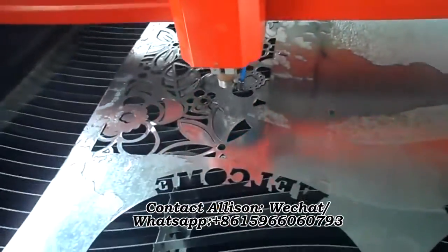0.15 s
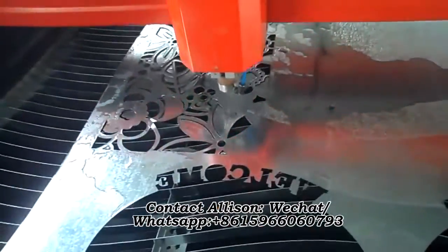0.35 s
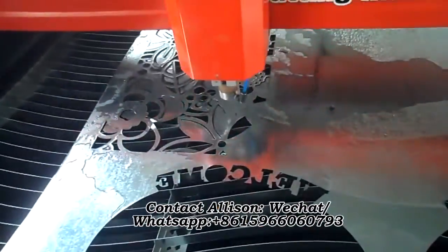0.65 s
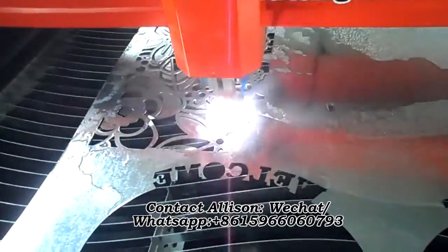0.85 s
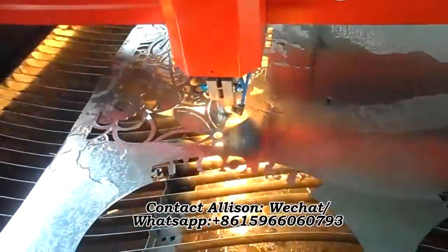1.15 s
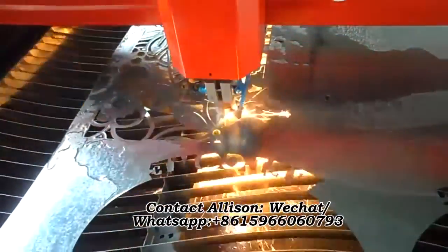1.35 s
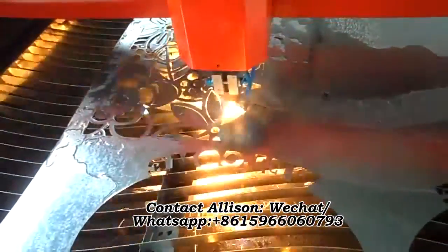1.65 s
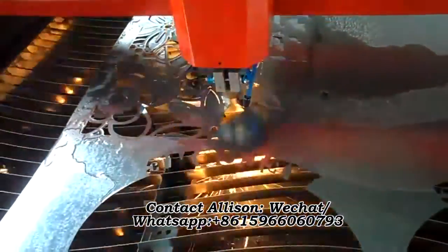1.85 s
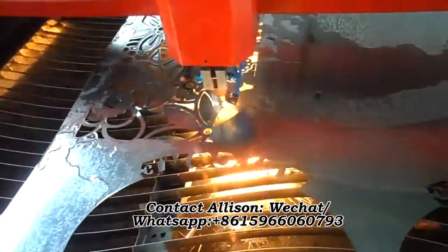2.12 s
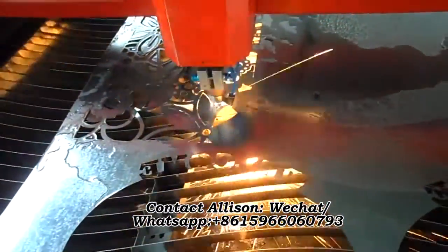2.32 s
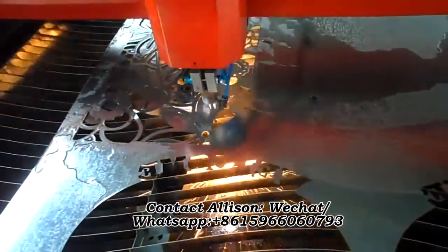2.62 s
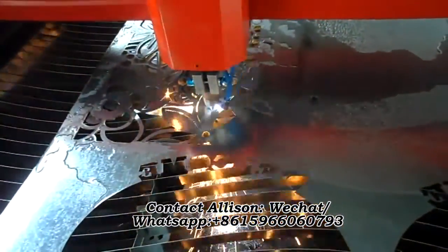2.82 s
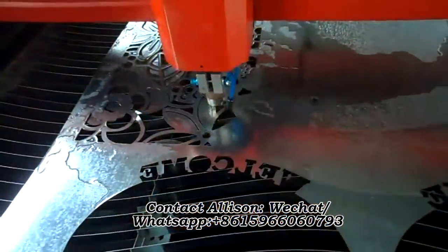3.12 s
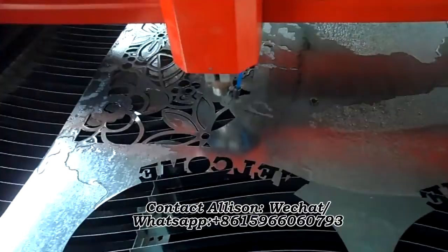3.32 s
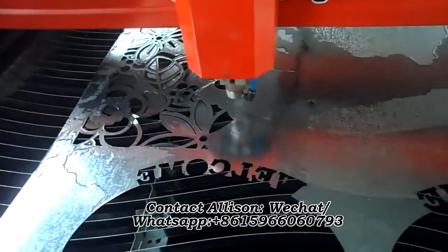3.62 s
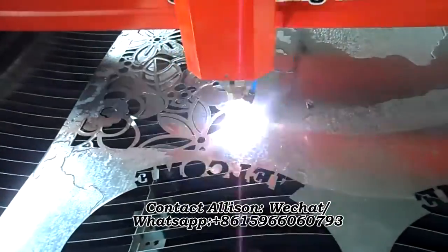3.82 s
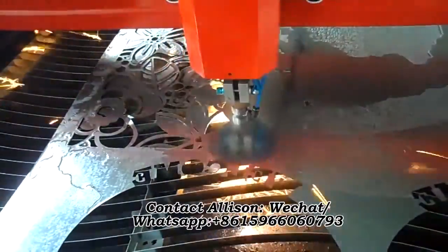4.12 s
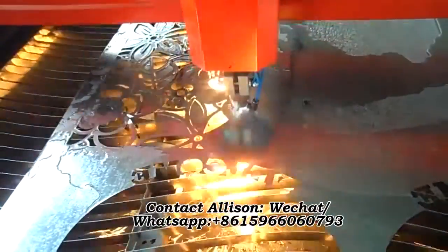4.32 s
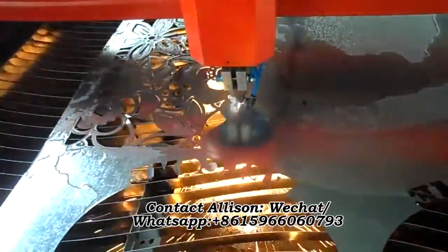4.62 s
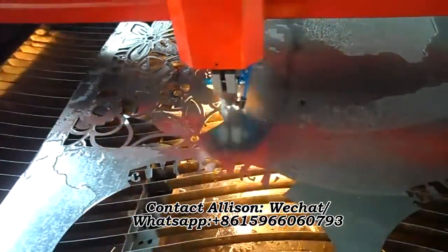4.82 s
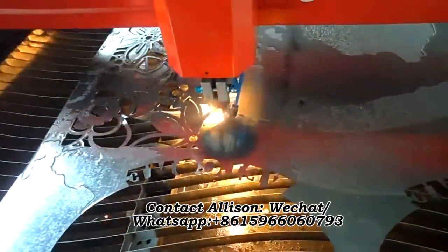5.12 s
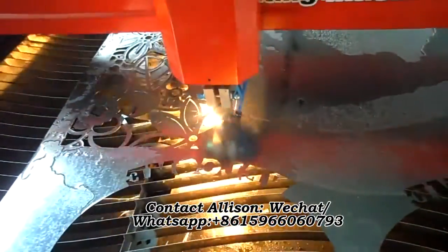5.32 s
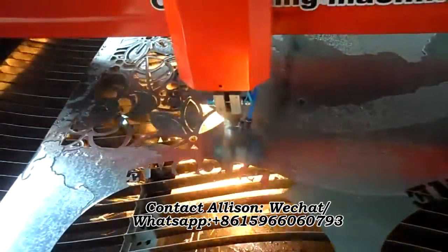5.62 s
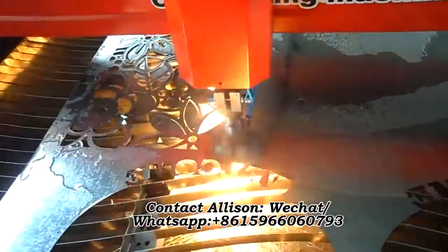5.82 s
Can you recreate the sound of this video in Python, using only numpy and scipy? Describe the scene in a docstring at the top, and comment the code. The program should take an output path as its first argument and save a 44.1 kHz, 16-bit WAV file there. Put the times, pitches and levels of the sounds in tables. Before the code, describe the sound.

A plasma cutter blows a hollow jet of gas, then snaps alight and sizzles through a steel sheet. The bright hiss wanders and surges, with tiny spatter ticks and short whistles. Midway the arc dies with a pop, leaving about a second of rising gas before it strikes and cuts again. A stationary microphone also picks up the workshop's steady rush and a fume extractor's faint rumble.

```python
"""Plasma torch cutting steel

In a workshop, a machine-guided torch cuts thin steel sheet on a slatted table. Raised above the sheet,
its open gas jet rings hollowly. The arc strikes with a snap and pierces the steel, and the sound turns
to a bright, wandering hiss with brief whistles in the cut. The arc pops out, the jet builds again and
a second cut starts. Shop noise and a fume extractor carry on underneath."""
import sys
import numpy as np
from scipy import signal
from scipy.fft import rfft, irfft, next_fast_len
from scipy.io import wavfile

SR = 44100
rng = np.random.default_rng(int(sys.argv[2]) if len(sys.argv) > 2 else 0)


def store_pcm(level_fs):
    """Save levels as 16-bit WAV."""
    pcm = np.round(np.clip(level_fs, -1, 1) * 32767).astype(np.int16)
    wavfile.write(sys.argv[1], SR, np.atleast_2d(pcm).T)


N = 262395
TIME = np.arange(N) / SR
BIN_HZ = np.maximum(np.arange(N // 2 + 1) * SR / N, 1)
CUTOFF_HZ = 15720

# The tone of each noise. Each row: frequency in Hz, relative strength in dB.
SHOP_SPECTRUM = [(15, -36), (25, -11), (91, -9.5), (183, -9.5), (274, -8), (331, -10), (666, -9.5),
                 (762, -12.5), (1140, -10), (1570, -11.5), (3170, -7.5), (4870, -12.5), (7300, -6.5),
                 (9810, -12.5), (15500, -13.5)]
JET_ROAR_SPECTRUM = [(15, -38), (25, -2), (76, 0), (225, -2.5), (369, -11), (406, -7.5), (595, -5),
                     (778, -7.5), (1140, -3), (1730, -8), (2400, 4), (3120, -30), (5280, -120)]
JET_HISS_SPECTRUM = [(1500, -2), (2000, -11), (2400, 5), (2750, 3), (3250, -1), (3900, -9), (5400, -12.5),
                     (6100, -3.5), (6900, -4.5), (7500, 0.5), (8400, -5.5), (9100, -5), (10500, -16.5),
                     (15000, -7.5)]
RUMBLE_SPECTRUM = [(20, -16), (34, 3.5), (55, -5), (90, 2.5), (150, -6), (205, 0.5), (250, -5.5),
                   (310, -8.5)]
SPLASH_SPECTRUM = [(1500, -13), (2100, -6), (2500, 7.5), (2950, -13), (3700, -27), (5600, -13), (6450, 3),
                   (7000, -2), (7450, -2), (8500, -13), (11800, -17), (15000, -26)]
CUT_SPECTRUM = [(15, -37), (25, 3.5), (152, -3.5), (204, -15), (378, -25), (598, -15.5), (945, -6),
                (1050, -4), (1800, -6.5), (3260, -2.5), (3830, -2.5), (6050, -1), (8810, -2.5), (12200, 0),
                (15500, -5)]
# Resonances (+) and hollows (-) of the cutting table. Each row: pitch in Hz, width in Hz, gain in dB.
TABLE_RESONANCES = [(86, 25, -0.5), (218, 29, 3), (364, 67, -3), (417, 24, 3.5), (505, 5.9, 5.5),
                    (596, 67, 4.5), (692, 47, 4), (915, 36, -3), (1290, 57, 2), (1406, 88, -3),
                    (1550, 130, 2.5), (1800, 110, -4.5), (2055, 160, 3.5), (2320, 80, -1), (2537, 99, -7),
                    (3180, 250, 1.5), (3850, 400, -3)]
# Narrow tones of the open jet. Each row: pitch in Hz, width in Hz, lift in dB.
JET_RESONANCES = [(2567, 35, 8.5), (2820, 160, 1.5), (5030, 170, 8.5), (7340, 150, 2)]
# Gas blows freely and builds until the arc strikes.
# Each row: start and end in seconds, relative level it climbs to in dB, base climb in dB per second.
JET_BLOWS = [(-.1, 0.919, 0, 1.06), (3.328, 4.001, -3.5, 15)]
# The open jet's roar, hollow ring and upper hiss.
# Each row: level in dB, share of the base climb, lift close to the sheet in dB.
JET_LAYERS = [(-25.5, 0.56, 2), (-20.5, 0.64, 0), (-19.5, 0.9, 0.4)]
# When the arc burns. Each row: start and end in seconds.
ARC_SPANS = [(.911, 3.033), (3.993, 6.0)]
# The arc bores through the sheet.
# Each row: strike and breakthrough in seconds, splash level in dB, lift of the sizzle in dB.
PIERCES = [(0.917, 1.121, -24, 4), (3.99, 4.218, -26.5, 3)]
# The arc strikes or dies. Each row: time in seconds, low boom in dB, crack in dB, seconds for the
# crack to fade by 60 dB.
ARC_SNAPS = [(0.9117, -13.5, -12, 0.062), (3.028, -10.5, -12, 0.04), (3.0818, -33, -15.5, 0.021),
             (3.104, -25, -16, 0.023), (3.9938, -14, -10, 0.019)]
# The jet sings on an edge. Each row: start and end in seconds, pitch in Hz, width in Hz, level in dB.
EDGE_WHISTLES = [(.5, .97, 6300, 270, -35), (1.43, 1.884, 3350, 160, -29), (1.435, 1.885, 6130, 300, -30.5),
                 (1.663, 1.868, 1586, 150, -34.5), (1.69, 1.883, 1070, 220, -35.5),
                 (1.98, 2.35, 2764, 140, -31), (2.15, 2.6, 7840, 500, -35), (2.48, 2.62, 6260, 250, -34),
                 (2.74, 2.857, 3170, 250, -32), (2.92, 3.03, 5960, 300, -29.5),
                 (3.37, 3.553, 4300, 360, -34.5), (4.225, 4.43, 12100, 800, -31),
                 (4.493, 5.297, 2290, 140, -36), (4.51, 6.1, 1065, 77, -38.5), (4.72, 5.05, 5250, 220, -29),
                 (4.82, 5.3, 1960, 250, -36), (4.9, 5.36, 3200, 250, -37), (5.34, 5.44, 12600, 500, -25),
                 (5.375, 5.51, 6040, 220, -24.5)]
# Rise and fall of the flame below, one list per cut. Each row: time in seconds, relative level in dB.
FLAME_CURVES = [
    [(1.0, -41.5), (1.124, -40), (1.76, -38.5), (2.172, -36.5), (2.492, -40.5), (2.95, -40.5)],
    [(4.1, -43), (4.24, -48), (4.5, -41.5), (5.228, -37), (5.528, -35.5), (5.9, -37.5)],
]
# Rise and fall of the arc's roar, one list per cut. Each row: time in seconds, base level in dB.
ROAR_CURVES = [
    [(1.0, -33.5), (1.092, -35), (1.118, -36.5), (1.83, -32), (1.912, -35), (2.254, -28.5), (2.83, -36),
     (2.884, -43), (2.95, -30.5)],
    [(4.1, -35), (4.49, -36.5), (4.596, -32), (4.75, -36.5), (4.886, -32.5), (5.308, -30.5), (5.328, -34.5),
     (5.614, -28.5), (5.9, -35.5)],
]
# The jet bites into more metal. Each row: peak time and length in seconds, hiss and sizzle lifts in dB.
METAL_BITES = [(1.094, 0.045, 3, 0.5), (1.46, 0.1, 2, 4), (1.62, .11, 4, 4), (1.836, .05, 3.5, 0.5),
               (2.083, 0.09, 4, 2), (2.26, 0.17, 1, 0.5), (2.452, 0.076, 6, 5.5), (2.798, .08, 4, 5.5),
               (3.0, .08, 4.5, 3.5), (4.78, 0.11, 3, 5.5), (5.405, .06, 3.5, 3), (5.75, 0.17, 5, 4.5),
               (5.927, 0.054, 4, 4)]
# The treble sinks after each breakthrough. Each row: time and length in seconds, sizzle loss in dB.
TREBLE_LULLS = [(1.335, 0.15, 4), (4.52, 0.21, 7.5)]
# The rasp chokes for an instant. Each row: time and length in seconds, rasp loss in dB.
RASP_CHOKES = [(1.185, .06, 2), (1.412, 0.029, 11), (1.885, 0.033, 3), (2.89, 0.049, 2), (4.24, 0.036, 7),
               (4.36, .06, 6), (4.467, .045, 13), (5.36, 0.022, 9), (5.695, .04, 7.5)]


def from_db(db):
    """Turn decibels into a gain."""
    return 10 ** (np.asarray(db) / 20)


def unit_power(x):
    """Scale a signal to an average power of 1."""
    return x / np.sqrt(np.mean(x ** 2) + 1e-20)


def level_curve(cuts):
    """Join the points of all cuts into one level for every sample."""
    seconds, db = np.vstack(cuts).T
    return np.interp(TIME, seconds, db)


def during(spans, edge_s):
    """One inside the spans and zero outside, with short ramps at their ends."""
    return sum(np.clip(np.minimum(TIME - start, end - TIME) / edge_s + .5, 0, 1) for start, end in spans)


def swells(rows, lead_s=0):
    """Bell-shaped swings in dB; each length is the width at half height."""
    return sum(db * .5 ** ((2 * (TIME + lead_s - s) / length) ** 2) for s, length, db in rows)


def drift(per_s):
    """A random wander of typical size 1 that picks `per_s` new values a second."""
    points = rng.standard_normal(16384)
    return unit_power(np.interp(TIME * per_s, np.arange(len(points)), points))


def colour(spectrum):
    """A gain for every frequency, joining the points of a spectrum."""
    hz, db = np.transpose(spectrum)
    return from_db(np.interp(np.log(BIN_HZ), np.log(hz), db))


def peak(hz, width, height=1):
    """A bell-shaped bump around one frequency."""
    return height / (1 + (2 * (BIN_HZ - hz) / width) ** 2)


def resonances(rows):
    """A gain for every frequency, from a set of bumps and hollows."""
    return from_db(sum(peak(hz, width, db) for hz, width, db in rows))


def band(low_hz, high_hz):
    """A gain that falls steeply outside two frequencies."""
    return 1 / np.sqrt((1 + (low_hz / BIN_HZ) ** 16) * (1 + (BIN_HZ / high_hz) ** 16))


def noise(gain):
    """Noise of power 1, shaped by a gain for every frequency."""
    size = next_fast_len(N, True)
    gain = np.interp(np.arange(size // 2 + 1) * SR / size, BIN_HZ, gain * (BIN_HZ < CUTOFF_HZ))
    white = rfft(rng.standard_normal(size))
    return unit_power(irfft(white * gain, size)[:N])


def moving_echoes(x, depth, changes_per_s, count=28, shortest_s=.0008, longest_s=.016):
    """Echoes off the sheet and machine come and go as the torch travels, so the treble wanders."""
    treble = signal.sosfilt(signal.butter(1, 1200, "high", fs=SR, output="sos"), x)
    delays = np.geomspace(shortest_s, longest_s, count) * rng.uniform(0.94, 1.05, count)
    echoes = sum(drift(changes_per_s) * np.roll(treble, int(delay * SR)) for delay in delays)
    return (x + depth * echoes / np.sqrt(count)) / np.hypot(1, depth)


def workshop_echo(x, echo_db=-12, fade_s=0.29):
    """The machine frame and the walls add a weak, blurred tail."""
    age = TIME[:SR // 2]
    tail = rng.standard_normal(len(age)) * from_db(-60 * age / fade_s) * (age > .008)
    return x + from_db(echo_db) * signal.oaconvolve(x, tail / np.linalg.norm(tail))[:N]


def extractor(level_db=-43):
    """The fume extractor rumbles steadily under the table."""
    return from_db(level_db) * noise(band(27, 190))


def shop_noise(table_tone, level_db=-29):
    """The steady rush of the shop and of gas that keeps leaking from the nozzle."""
    rush = noise(colour(SHOP_SPECTRUM) * table_tone)
    return from_db(level_db) * moving_echoes(rush, depth=0.44, changes_per_s=1.52)


def jet_flow(climb_share, close_db, attack_s=0.054, descent_s=0.17):
    """Gain of one jet layer: it opens fast, climbs, lifts as the torch drops, then stops suddenly."""
    gain = 0
    for start, end, db, climb in JET_BLOWS:
        opening = during([(start, end)], 0.0063) * np.clip((TIME - start) / attack_s, 0, 1)
        left_to_climb_db = climb_share * climb * np.maximum(end - TIME, 0)
        close = during([(end - descent_s, end + descent_s)], 0.065)
        gain += opening * from_db(db - left_to_climb_db + close_db * close)
    return gain


def open_jet(table_tone, flutter_db=1.0):
    """Gas from the raised nozzle makes a low roar, a fluttering hollow ring and an upper hiss."""
    tones = colour(JET_HISS_SPECTRUM) * resonances(JET_RESONANCES) * table_tone
    roar = noise(colour(JET_ROAR_SPECTRUM) * table_tone * band(22, 1950))
    ring = noise(tones * band(1860, 3900))
    ring *= unit_power(from_db(flutter_db * drift(per_s=260)))
    hiss = noise(tones * band(4050, 19000))
    rush = sum(from_db(db) * jet_flow(share, close_db) * layer
               for (db, share, close_db), layer in zip(JET_LAYERS, [roar, ring, hiss]))
    return moving_echoes(rush, depth=0.41, changes_per_s=2.45)


def gas_puff(table_tone, level_db=-25, fade_s=0.11):
    """When the first arc dies, hot gas left in the torch puffs out and fades."""
    age = TIME - ARC_SPANS[0][1]
    fade = (age > 0) * from_db(level_db - 60 * np.maximum(age, 0) / fade_s)
    return fade * noise(colour(SHOP_SPECTRUM) * table_tone * band(60, 14000))


def flame_rumble(table_tone, level_db=-41, swing_scale=1.7):
    """The flame that leaves the cut rumbles below the sheet."""
    strength = during(ARC_SPANS, 0.0047) * from_db(swing_scale * level_curve(FLAME_CURVES))
    rumble = noise(colour(RUMBLE_SPECTRUM) * table_tone * band(22, 326))
    return from_db(level_db) * unit_power(strength) * rumble


def spatter(sizzle_db, drops_per_s=350, spread_db=6, offset_db=-15):
    """Molten droplets burst off the cut as tiny ticks, louder when the sizzle is strong."""
    sizes = from_db(spread_db * np.minimum(rng.exponential(1, N), 3))
    signs = rng.choice([-1, 1], N)
    ticks = sizes * signs * (rng.random(N) < drops_per_s / SR)
    ticks = signal.sosfilt(signal.butter(1, [2500, 11000], "band", fs=SR, output="sos"), ticks)
    return during(ARC_SPANS, .005) * from_db(sizzle_db + offset_db) * unit_power(ticks)


def whistles(flutter_db=2, attack_s=0.029, release_s=0.042):
    """The jet grazes an edge and sings, fading as the torch turns away or the gas stops."""
    out = np.zeros(N)
    for start, end, hz, width, db in EDGE_WHISTLES:
        ramp = np.minimum((TIME - start) / attack_s, (end - TIME) / release_s)
        swell = np.sqrt(np.clip(ramp, 0, 1))
        tone = noise(peak(hz, width))
        out += from_db(db + flutter_db * drift(per_s=40)) * swell * tone
    return out


def snaps(table_tone, push_hz=150, push_fade_s=0.02, thump_fade_s=0.029):
    """Gas expands or collapses at once: a pressure push and a dull thump under a bright crack."""
    dull = noise(table_tone * band(68, 5000) / np.hypot(1, BIN_HZ / 700))
    bright = noise(table_tone * band(860, 15000) / np.hypot(1, BIN_HZ / 6500))
    out = np.zeros(N)
    for start, boom_db, crack_db, crack_fade_s in ARC_SNAPS:
        age = np.clip(TIME - start, 0, 1)
        push = np.sin(2 * np.pi * push_hz * age) * from_db(-4 - 60 * age / push_fade_s)
        thump = dull * from_db(-8 - 60 * age / thump_fade_s)
        crack = bright * from_db(crack_db - 60 * age / crack_fade_s)
        out += (TIME > start) * (from_db(boom_db) * (push + thump) + crack)
    return out


def piercing(table_tone):
    """The jet splashes back off the sheet with a hollow ring until the hole opens."""
    gain = sum(from_db(db) * during([(strike, through)], .005) for strike, through, db, _ in PIERCES)
    return gain * noise(colour(SPLASH_SPECTRUM) * table_tone * band(1300, 19000))


def cut_levels():
    """Levels in dB of the cut's four bands, low to high, as the jet bites, lulls, chokes and bores."""
    base_roar_db = level_curve(ROAR_CURVES)
    load = base_roar_db - base_roar_db.mean()
    surge = swells([(s, length, db) for s, length, db, _ in METAL_BITES])
    flare = swells([(s, length, db) for s, length, _, db in METAL_BITES], lead_s=0.01)
    lull, choke = swells(TREBLE_LULLS), swells(RASP_CHOKES)
    boring = sum(db * during([(strike, through)], .03) for strike, through, _, db in PIERCES)
    roar_db = 0.73 + base_roar_db - 0.27 * choke
    rasp_db = -26.5 + 0.42 * surge - 0.16 * lull - choke + 0.35 * load
    hiss_db = -23 + surge - 0.8 * lull - 0.44 * choke
    sizzle_db = -24 + flare - lull - 0.16 * load + boring
    return roar_db, rasp_db, hiss_db, sizzle_db


def cutting_arc(table_tone, levels_db, flicker_db=0.8, sputter_db=0.9, spit_db=0.24):
    """The jet tears through molten steel; the whole hiss sputters as the melt is blown out."""
    tone = colour(CUT_SPECTRUM) * table_tone
    bands_hz = [(300, 1830), (2000, 4040), (4000, 8900), (9000, 19000)]  # roar, rasp, hiss, sizzle
    rush = sum(noise(tone * band(low, high)) * from_db(db + flicker_db * drift(per_s=45))
               for db, (low, high) in zip(levels_db, bands_hz))
    sputter = from_db(-0.3 + sputter_db * drift(per_s=70) + spit_db * drift(per_s=900))
    return during(ARC_SPANS, 0.0035) * sputter * moving_echoes(rush, depth=0.64, changes_per_s=6)


def scene():
    """The torch and the steady shop noise, heard from one spot."""
    table_tone, levels_db = resonances(TABLE_RESONANCES), cut_levels()
    arc = piercing(table_tone) + cutting_arc(table_tone, levels_db) + spatter(levels_db[-1])
    arc += flame_rumble(table_tone) + snaps(table_tone)
    shop = shop_noise(table_tone)
    gas = open_jet(table_tone) + gas_puff(table_tone) + whistles()
    mono = workshop_echo(extractor() + shop + gas + arc)
    return np.array([mono, mono])


def record(dry):
    """A mono microphone that steeply cuts the highest treble."""
    return signal.sosfilt(signal.ellip(12, .1, 90, CUTOFF_HZ, fs=SR, output="sos"), dry)


dry = scene()
out = record(dry)
store_pcm(out)
```